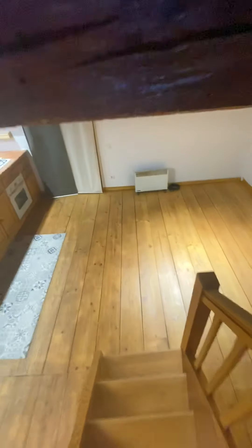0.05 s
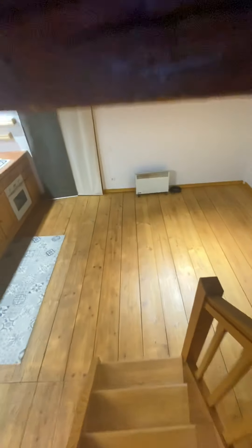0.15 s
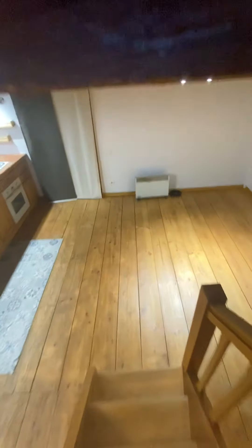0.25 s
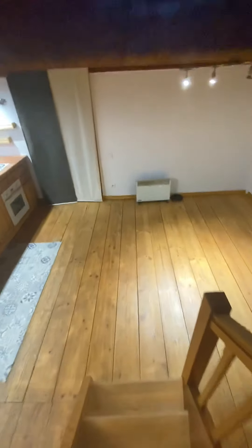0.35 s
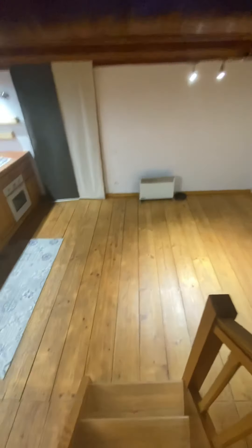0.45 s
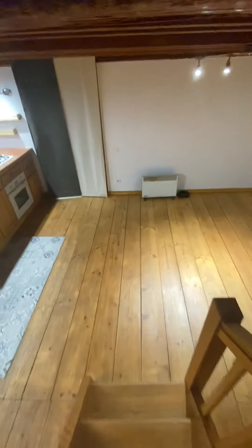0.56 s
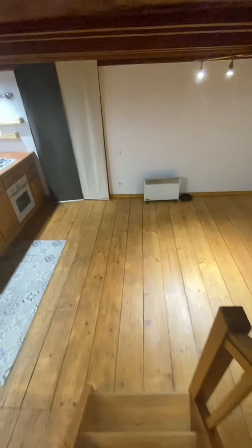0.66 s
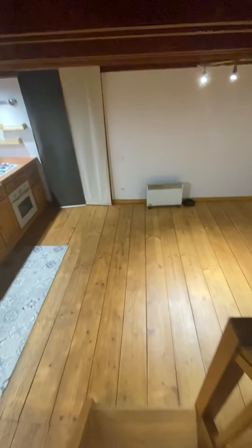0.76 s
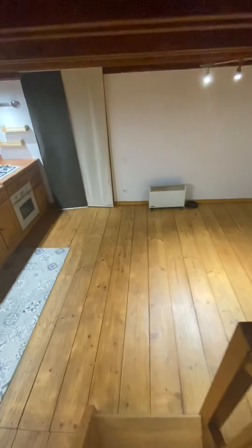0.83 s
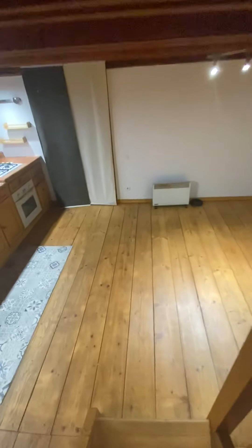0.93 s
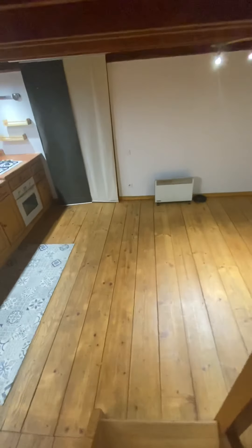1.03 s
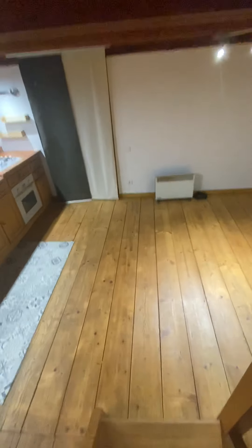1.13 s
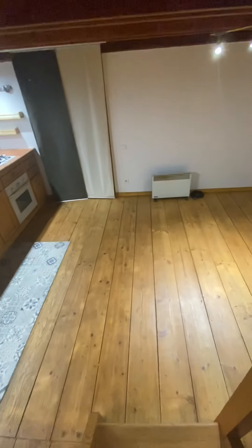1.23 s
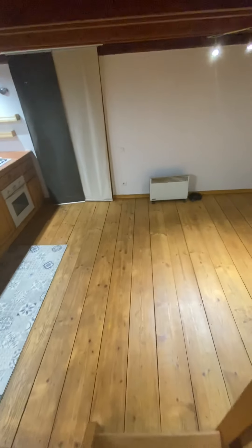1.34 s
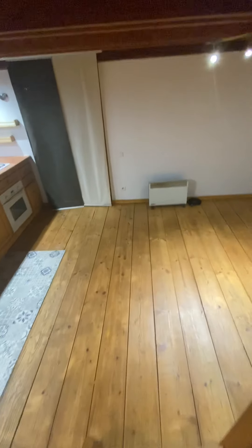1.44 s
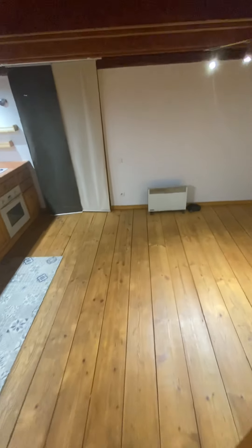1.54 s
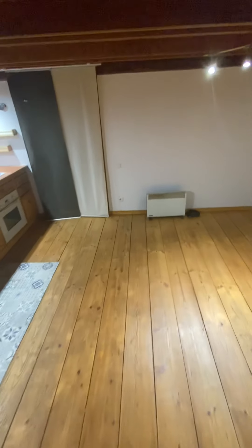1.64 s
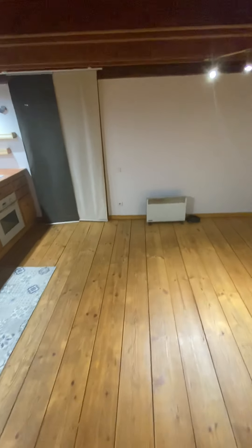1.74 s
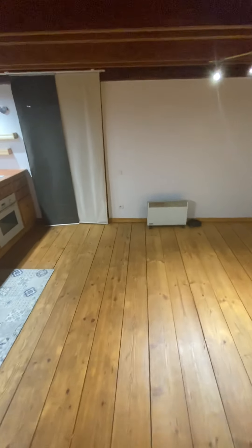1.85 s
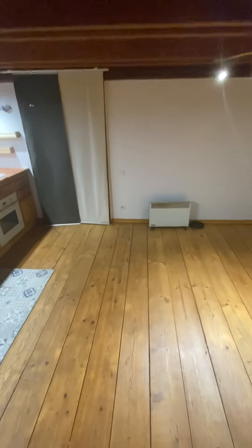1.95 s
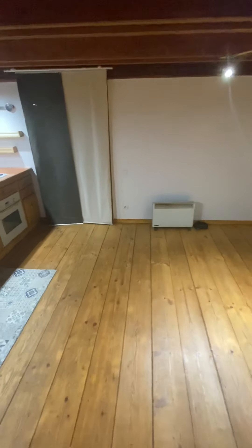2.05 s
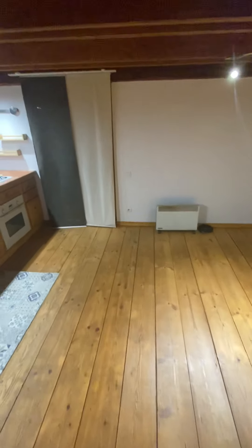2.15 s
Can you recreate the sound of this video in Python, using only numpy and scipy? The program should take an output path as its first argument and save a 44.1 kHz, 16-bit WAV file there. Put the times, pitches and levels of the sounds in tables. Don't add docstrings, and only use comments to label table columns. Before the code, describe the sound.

Dull wooden footsteps on the last treads of a staircase, each ringing briefly in an empty wood-floored room; faint clothing rustle, tiny ticks on the microphone casing and a very quiet low house rumble.

```python
import sys
import numpy as np
from scipy import signal
from scipy.fft import rfft, irfft
from scipy.io import wavfile

SR = 44100
rng = np.random.default_rng(int(sys.argv[2]) if len(sys.argv) > 2 else 0)


def bounce(signal):
    frames = np.transpose(np.atleast_2d(signal))
    limited = np.clip(frames, -1, 1)
    pcm = np.round(limited * 32767).astype(np.int16)
    wavfile.write(sys.argv[1], SR, pcm)


def level_to_linear(level):
    exponent = np.asarray(level, float) / 20
    return 10 ** exponent


N = 97020

# start_s, level_db, roll_on_s, tick_db, knock_db
LANDINGS = [
    (0.201, -20, .009, -41.5, -58),
    (0.67, -42.5, .004, -57, -60),
    (0.866, -23, 0.013, -43.5, -32),
    (1.623, -22.5, .013, -48, -60),
]
# pitch_hz, level_db, t60_s
FIRST_TREAD = [(44, -27, 1), (99, -9, 0.47), (125.3, 0, 0.52), (139.4, -4, 0.2), (161.7, -10, 0.57),
               (208.2, -19, 0.69), (254, -9, 0.14), (327, -17.5, .4), (439.5, -14.5, 0.5), (514, -5, 0.117),
               (646, -9.5, .2), (936, -18, 0.27), (791, -18, 0.14), (2620, -20, 0.056)]
SECOND_TREAD = [(92.6, 1, 0.42), (124.3, -6, 0.45), (244, -7.5, .3), (384, -5, 0.16), (510, -2.5, 0.16),
                (639, -4.5, 0.17), (790, -10.5, 0.11), (2180, -12, 0.058), (2430, -15, 0.075)]
THIRD_TREAD = [(51.5, -16.5, 0.78), (85.2, -13, 0.74), (124, 6, 0.11), (207, -7.5, .45),
               (286.7, -7.5, 0.53), (359, -10.5, 0.57), (445.7, -2.5, 0.38), (607, -10, 0.39),
               (663, -11, 0.55), (777, -11.5, 0.52), (1060, -17.5, 0.52), (1170, -15.5, 0.11),
               (1540, -32, 0.19), (2752, -14, 0.089)]
LAST_TREAD = [(90.1, -19, 0.88), (105.6, -6.5, .4), (138.7, -14, .4), (170.3, -5, 0.28), (219, -1.5, 0.16),
              (268.7, -9.5, 0.27), (360.2, -10.5, 0.31), (548.5, -1.5, 0.28), (595, 4, 0.16),
              (641.4, -2, 0.19), (734, -3.5, .3), (767, -5.5, 0.37), (1070, -17.5, 0.51),
              (1190, -17.5, 0.52)]
TREADS = (FIRST_TREAD, SECOND_TREAD, THIRD_TREAD, LAST_TREAD)
# pitch_hz, density_db_per_hz
FIRST_COLOUR = [(30, -24), (126, -5), (266, -15), (500, -13), (850, -23), (2000, -38.5), (5000, -46.5)]
SECOND_COLOUR = [(30, -3), (156, -1.5), (640, -13.5), (900, -23.5), (2200, -28), (5000, -40)]
THIRD_COLOUR = [(30, -13), (100, -3), (280, -0.5), (700, -3), (1200, -11.5), (2700, -18), (4000, -35)]
LAST_COLOUR = [(30, -13), (104, -3), (350, -7), (600, 0.5), (1100, -14), (2000, -27), (5000, -42)]
COLOURS = (FIRST_COLOUR, SECOND_COLOUR, THIRD_COLOUR, LAST_COLOUR)
# pitch_hz, t60_s
ROOM_DECAY = [(40, 1), (120, 0.97), (400, 0.74), (1000, .7), (3000, 0.64), (6000, 0.14)]
ROOM_LEVEL = [-25, -46, -34, -31]
# start_s, level_db
WEIGHT_SHIFTS = [(0.385, -47.5), (0.429, -44), (0.61, -59.5), (0.739, -56), (0.97, -51), (1.30, -55),
                 (1.546, -57), (1.835, -44), (1.902, -46), (1.951, -50.5)]
# time_s, level_db, brightness_db_per_octave
LEG_SWING = [(0.0, -67, 1.5), (0.26, -56.5, -0.95), (0.54, -66.5, -1.3), (0.78, -63, -1), (0.87, -56.5, 4),
             (1.0, -58, 0.1), (1.18, -69, 6.8), (1.59, -58.5, 0.1), (1.7, -59, 1), (1.92, -65, -3.5),
             (1.95, -62.5, 0.2), (1.99, -69.5, -4.3), (2.2, -74, -6.9)]
# pitch_hz, density_db_per_hz
CLOTH_COLOUR = [(500, -16), (1200, -7), (2700, 3), (3600, 0), (5500, -1.5), (8000, -4.5), (11500, -15),
                (16000, -19.5)]
# pitch_hz, share_0_to_1
CLOTH_SHARED = [(500, .5), (1500, .55), (2800, .75), (5500, .75), (8000, .72), (10000, .96), (12000, .985),
                (15000, .97)]
# pitch_hz, density_db_per_hz
RUMBLE_COLOUR = [(25, -17), (50, -12.5), (98, 3), (150, -18), (300, -18.5), (500, -20), (800, -24.5),
                 (1500, -35)]
# time_s, level_db
RUMBLE_SWELL = [(0, -50), (.15, -55), (.55, -58.5), (.8, -53.5), (1.2, -58), (1.47, -62), (1.53, -62.5),
                (1.6, -58.5), (1.9, -63.5), (2.1, -66.5), (2.2, -56.5)]
# start_s, level_db, length_s, bright_start_db, top_pitch_hz
CASING_TAPS = [
    (0.5167, -46, 0.0043, -5, 9100),
    (0.5885, -45.5, 0.014, -12, 2430),
    (1.168, -45, 0.0031, 0, 4000),
    (1.904, -41, 0.012, -9, 1190),
    (1.999, -47.5, 0.013, 2, 1470),
    (2.075, -51.5, 0.018, 5.5, 1180),
]
# pitch_hz, share_0_to_1
ROOM_SHARED = [(40, 0.94), (130, 0.99), (300, 0.99), (600, 0.03), (1500, 0), (2800, 0.23), (5000, 1),
               (8000, 0), (14000, 0.95)]

LEFT_LAG = 8.2


def at_hz(points, hz):
    p = np.array(points)
    return np.interp(np.log(hz), np.log(p[:, 0]), p[:, 1])


def in_time(rows, axis=1):
    rows = np.array(rows)
    return np.interp(np.arange(N) / SR, rows[:, 0], rows[:, axis])


def drift(rate):
    r = np.exp(-80 * np.pi * rate / SR)
    slow = signal.lfilter([1], [1, -2 * r, r * r], rng.standard_normal(N // 40 + 2002))
    slow = slow[2000:]
    return np.interp(np.arange(N) / 40, np.arange(len(slow)), slow / slow.std())


def bands(likeness):
    f = np.maximum(np.fft.rfftfreq(N, 1 / SR), 1)
    alike = np.clip(at_hz(likeness, f), 0, 1)
    common, *own = rfft(rng.standard_normal((3, N)))
    late = np.exp(-2j * np.pi * f * LEFT_LAG / SR)
    pair = np.sqrt(alike) * common * [late, f ** 0] + np.sqrt(1 - alike) * np.array(own)
    for hz in 22 * 2 ** np.arange(0, 9.7, 1 / 3):
        window = np.cos(np.pi / 2 * np.clip(3 * np.log2(f / hz), -1, 1)) ** 2
        yield hz, irfft(pair * window, N)


def steady(spectrum, likeness, patchy_db, rate, tilt_db=0):
    together = drift(rate / 2)
    out = 0
    for hz, band in bands(likeness):
        flicker_db = patchy_db * (0.84 * together + drift(rate))
        out = out + band * level_to_linear(at_hz(spectrum, hz) + tilt_db * np.log2(hz / 5000) + flicker_db)
    return out / out.std()


def house_rumble():
    return level_to_linear(in_time(RUMBLE_SWELL)) * steady(RUMBLE_COLOUR, ROOM_SHARED, patchy_db=2.5, rate=3.8)


def casing_taps():
    sweep_cycles, end_hz = 1.268, 54.2
    out, t = np.zeros(N + SR), np.arange(SR // 8) / SR
    for s, db, length, bright_db, top_hz in CASING_TAPS:
        bright_start = level_to_linear(bright_db) * np.exp(-t / 0.0036)
        body = t / length * np.exp(1 - t / length)
        age = t + sweep_cycles / top_hz
        cycles = sweep_cycles * np.log(age / age[0]) + end_hz * t
        chirp = np.sin(2 * np.pi * cycles) * np.minimum(t * top_hz, 1)
        start = int(s * SR)
        out[start:start + len(t)] += level_to_linear(db) * (bright_start + body) * chirp
    return out[:N] * [[1.25], [-.75]]


def trouser_cloth():
    hiss = steady(CLOTH_COLOUR, CLOTH_SHARED, patchy_db=1.5, rate=4.3, tilt_db=in_time(LEG_SWING, axis=2))
    return level_to_linear(in_time(LEG_SWING) + 6.0) * hiss


def room():
    t, out = np.arange(N) / SR, 0
    blows = [(row[0], db, colour, 1) for row, db, colour in zip(LANDINGS, ROOM_LEVEL, COLOURS)]
    blows += [(s, db, LAST_COLOUR, 3.4) for s, db in WEIGHT_SHIFTS]
    for hz, band in bands(ROOM_SHARED):
        if hz > 6000:
            break
        power = np.zeros(N)
        build_s = 0.013 + 1.25 / hz
        for s, db, colour, faster in blows:
            start = int(s * SR)
            age = t[:N - start]
            build = 1 - np.exp(-(age / build_s) ** 2)
            level_db = db + at_hz(colour, hz) - 60 * faster * age / at_hz(ROOM_DECAY, hz)
            power[start:] += (level_to_linear(level_db) * build) ** 2
        out = out + band * np.sqrt(power) * level_to_linear(1.25 * drift(23))
    return out * level_to_linear(21)


def faint_modes(colour, level_db):
    modes = []
    for hz in np.exp(rng.uniform(np.log(850), np.log(3200), size=36)):
        mode_db = level_db - 4 + at_hz(colour, hz) + 3.5 * rng.standard_normal()
        modes.append((hz, mode_db, 0.27 * at_hz(ROOM_DECAY, hz)))
    return modes


def stair_treads():
    scatter, spread = 1.1, .45
    tick_s, knock_s = 0.0042, 0.0072
    out = np.zeros((2, N))
    sole_band = signal.butter(2, [1200, 3200], "band", fs=SR, output="sos")
    for landing, modes, colour, room_db in zip(LANDINGS, TREADS, COLOURS, ROOM_LEVEL):
        s, db, roll, tick_db, knock_db = landing
        start = int(s * SR)
        t = np.arange(min(N - start, SR // 2 + SR // 4)) / SR
        heard = out[:, start:start + len(t)]
        full_load_s = 1.35 * roll
        for hz, mode_db, t60 in modes + faint_modes(colour, room_db - db):
            stray, apart = rng.uniform(-np.pi, np.pi, size=2)
            side = np.array([[1], [-1]]) * apart * spread * np.clip(hz / 350 - .3, 0, 1.6) / 2
            phases = stray * scatter / 2 + side
            load = np.sin(np.pi / 2 * np.minimum(t / (roll + 1 / hz), 1)) ** 2
            swing = np.cos(2 * np.pi * hz * (t - full_load_s) + phases)
            heard -= level_to_linear(db + mode_db - 60 * t / t60) * load * swing
        tick = level_to_linear(tick_db) * np.exp(-t / tick_s)
        knock = level_to_linear(knock_db) * (t / roll) ** 2 * np.exp(-t / knock_s)
        scuff = rng.standard_normal((2, len(t))) * (tick + knock)
        heard += signal.sosfilt(sole_band, scuff) * 2.07
    return out


def scene():
    return house_rumble() + casing_taps() + trouser_cloth() + room() + stair_treads()


def roll_off(x):
    return signal.sosfilt(signal.butter(12, 16380, fs=SR, output="sos"), x)


def record(dry):
    peak_top, top_hz = .3, 16350
    dry = signal.sosfilt(signal.butter(3, 34, "high", fs=SR, output="sos"), dry)
    dry = peak_top * np.tanh(dry / peak_top)
    mix = signal.sosfilt(signal.cheby2(12, 60, top_hz, fs=SR, output="sos"), dry)
    return roll_off(mix)


dry = scene()
out = record(dry)
bounce(out)
```